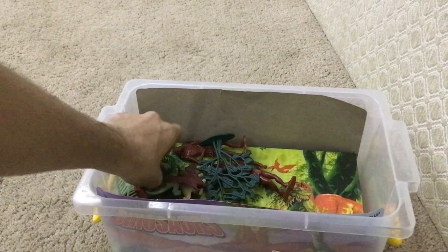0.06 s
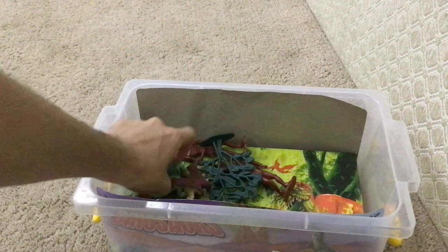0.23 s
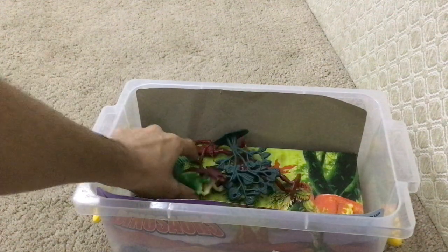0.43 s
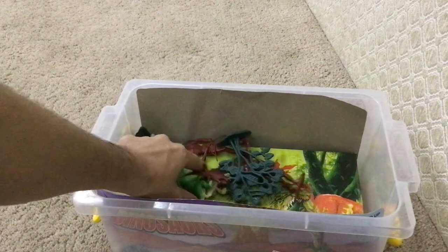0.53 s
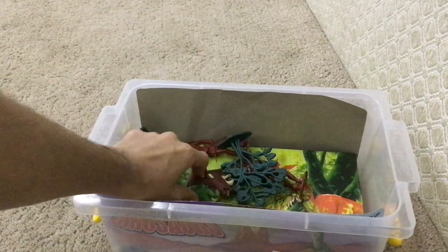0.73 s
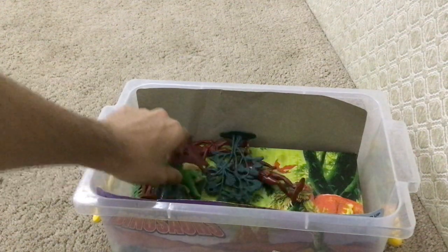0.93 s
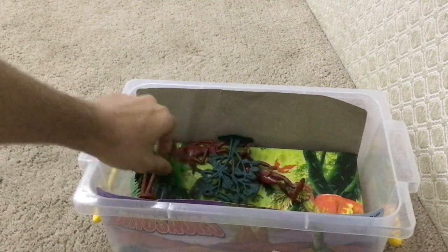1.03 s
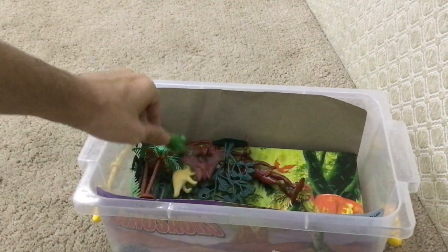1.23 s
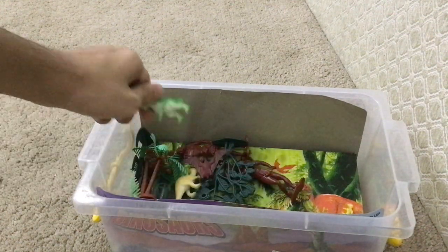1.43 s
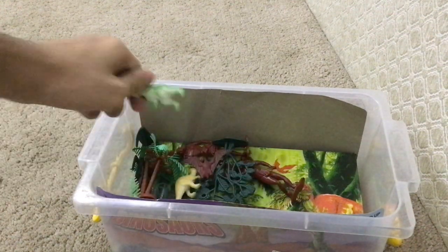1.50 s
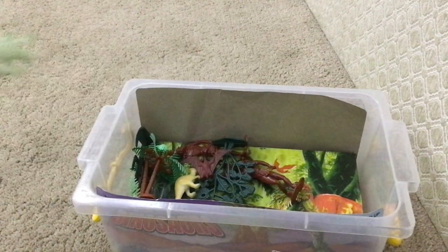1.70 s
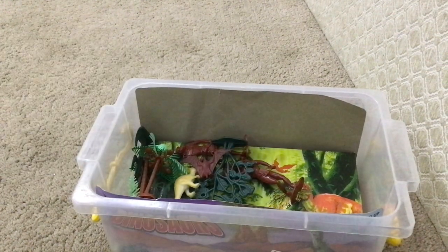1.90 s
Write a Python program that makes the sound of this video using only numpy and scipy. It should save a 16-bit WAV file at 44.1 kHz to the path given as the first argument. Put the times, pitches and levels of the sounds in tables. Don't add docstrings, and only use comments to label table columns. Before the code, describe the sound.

Plastic toys clatter and knock inside a hollow plastic bin as a hand rummages through them

```python
import sys
import numpy as np
from scipy import signal
from scipy.fft import rfft, irfft
from scipy.io import wavfile
from scipy.ndimage import uniform_filter1d

SR = 44100
rng = np.random.default_rng(int(sys.argv[2]) if len(sys.argv) > 2 else 0)


def volts_from_decibels(level):
    exponent = np.asarray(level, float) / 20
    return 10 ** exponent


def pcm_store(signal):
    levels = np.round(np.clip(np.atleast_2d(signal), -1, 1) * 32767)
    wavfile.write(sys.argv[1], SR, levels.astype(np.int16).T)


N = 85995


def evened(x):
    return x / np.sqrt(np.mean(x ** 2) + 1e-20)


def read(points, hz):
    f, value = np.transpose(points)
    return np.interp(np.log(hz + 1), np.log(f + 1), value)


def coloured(x, points):
    gain = volts_from_decibels(read(points, np.fft.rfftfreq(len(x), 1 / SR)))
    return irfft(rfft(x) * evened(gain), len(x))


def add(mix, start_s, sound):
    part = mix[round(start_s * SR):][:len(sound)]
    part += sound[:len(part)]


def tone(hz, t):
    return np.sin(2 * np.pi * hz * t)


BLOW_S = .0038

# frequency in Hz, level in dB, t60 in seconds.
BIN_MODES = [(153, -12.5, 0.27), (185.6, -12.5, 0.171), (275, -8.5, 0.094), (345, -2, 0.084),
             (417.7, -14, 0.21), (480, -11.5, 0.037), (534, -6, 0.09), (570, -26.5, 0.14), (632, -8, 0.12),
             (670, -16, .06), (774.7, -16.5, 0.14), (953, -10, 0.063), (1089, -1.5, 0.032),
             (1420, -41, 0.13)]


def knock(db, centre_hz, blow_db):
    spread_db, focus_db_per_octave = 2.5, -6.5
    detune, phase_scatter_cycles, rise_s = .012, .3, .003
    t = np.arange(SR // 4) / SR
    hz, mode_db, t60 = np.transpose(BIN_MODES)[:, :, None]
    level, phase, shift = rng.standard_normal((3, len(BIN_MODES), 1))
    octaves_off = abs(np.log2(hz / centre_hz))
    weight = volts_from_decibels(mode_db + spread_db * level + focus_db_per_octave * octaves_off)
    cycles = hz * (1 + detune * shift) * (t - BLOW_S) + phase_scatter_cycles * phase
    ring = (weight * volts_from_decibels(-60 * t / t60) * np.cos(2 * np.pi * cycles)).sum(0)
    ring *= (1 - np.exp(-(t / rise_s) ** 2)) / np.sqrt((weight ** 2).sum())
    u = t / BLOW_S
    pulse = (u * np.exp(1 - u)) ** 8
    blow = pulse * np.cos(2 * np.pi * centre_hz * 0.92 * (t - BLOW_S))
    return volts_from_decibels(db - 5.5) * (ring + volts_from_decibels(blow_db - 2.5) * blow)


# start in seconds, peak level in dB, centre frequency in Hz, sharpness of the blow in dB.
KNOCKS = [(.009, -26.5, 530, 3), (.039, -38, 570, 9), (.179, -31, 640, -12), (.201, -20, 640, 0.5),
          (.279, -30, 625, -13), (.289, -20, 550, 1.5), (.303, -18, 624, -10), (.331, -22.5, 630, -1),
          (.356, -24, 620, -12), (.368, -8, 530, -1), (0.3787, -14.5, 508, 6.5), (.3885, -15.5, 560, 6),
          (.401, -16.5, 620, -1), (.445, -26.5, 510, 2), (.472, -24, 610, -3), (.508, -22, 640, -15),
          (.539, -23.5, 640, 1), (.568, -20.5, 660, 3.5), (.652, -34.5, 346, 6.5), (.694, -35, 553, 2.5),
          (.763, -30, 535, 0), (.782, -24.5, 490, 9), (.863, -36.5, 290, -5), (.941, -32, 246, 6.5),
          (.966, -28.5, 345, 3.5),
          (1.051, -33, 345, 0), (1.087, -34.5, 620, -7), (1.185, -11, 480, 3), (1.213, -12, 480, 3),
         (1.222, -23, 600, -3), (1.245, -22, 450, 0), (1.264, -30, 545, 2), (1.314, -21, 420, -1),
         (1.327, -24, 420, -4), (1.398, -22.5, 540, 5.5), (1.409, -32, 550, -4),
          (0.68, -33, 550, 2), (.744, -39, 340, 1), (0.91, -32.5, 560, -2), (0.99, -36.5, 300, 0),
          (1.1, -37, 370, 0), (0.91, -41, 390, -4), (1.145, -41, 390, 0), (2.1, -51.5, 580, -2),
          (.486, -33, 290, -2), (0.47, -29, 310, 0), (.413, -24, 460, -1.5), (0.087, -42, 350, -0.5),
          (.252, -43.5, 320, 0)]


def knocks():
    out = np.zeros(N)
    for start_s, db, hz, blow_db in KNOCKS:
        add(out, start_s, knock(db, hz, blow_db))
    return out


# start in seconds, peak level in dB.
AIR_BLOWS = [(.179, -35.5), (.201, -28), (.289, -27), (.303, -21.5), (.331, -29), (.356, -30.5),
             (.368, -19), (.3885, -23), (.401, -25), (.441, -35), (.472, -34), (.5, -34), (.512, -30.5),
             (.54, -33), (.568, -29), (.763, -38), (1.185, -15), (1.213, -17), (1.398, -34), (1.25, -32),
             (1.264, -32)]


def air():
    air_hz, t60_s, rise_s, detune = 634, .11, .003, 0.0065
    out, t = np.zeros(N), np.arange(SR // 4) / SR
    for start_s, db in AIR_BLOWS:
        hz = air_hz * (1 + detune * rng.standard_normal())
        envelope = volts_from_decibels(db - 60 * t / t60_s) * (1 - np.exp(-t / rise_s))
        add(out, start_s, envelope * np.cos(2 * np.pi * hz * (t - BLOW_S)))
    return out


# start in seconds, peak level in dB, ring in
# Hz, relative treble snap in dB.
TICKS = [(0.0074, -47, 2270, -25), (0.146, -50, 2950, -2), (0.1534, -63.5, 2150, -15),
         (0.1792, -47.5, 2640, -32), (0.1993, -38.5, 2400, -41), (0.2877, -38.5, 2360, -29),
         (0.3023, -35.5, 2420, -43), (0.3306, -39, 2270, -19), (0.3539, -30, 2510, -10.5),
         (0.368, -26, 2680, -20), (0.3761, -33, 2513, -28), (0.404, -33.5, 2270, -33),
         (0.4213, -40, 3070, -23), (0.5156, -45.5, 2600, -28), (0.5357, -34.5, 2460, -16),
         (0.5428, -33.5, 3110, -22), (0.5682, -30.5, 2990, -33), (0.635, -47.5, 3200, -8),
         (0.6456, -50, 3300, -15), (0.3887, -41, 2820, -25), (0.436, -45, 2910, -25),
         (.453, -49, 2680, -30), (.4751, -47, 2430, -25), (.488, -46, 3010, -25), (.506, -51, 4400, -25),
         (0.6946, -50.5, 2370, -10), (0.7484, -58, 2310, -2), (0.7635, -45, 2280, -25),
         (0.7747, -44.5, 3420, -31), (0.7825, -40, 2420, -23), (0.8186, -49.5, 2560, -23),
         (0.901, -47, 2960, -13), (0.9303, -41.5, 3880, -25), (.956, -49, 2613, -20),
              (0.966, -44.5, 2530, -30), (1.1165, -51, 2400, -23), (1.281, -51, 2290, -30),
              (0.9937, -49, 2520, -39), (1.051, -51.5, 2190, -28), (1.069, -49, 2900, -20),
              (1.1406, -51, 2230, -23), (1.151, -48.5, 2350, -28.5), (1.1854, -29.5, 2170, -26),
              (1.1938, -39.5, 2170, -32), (1.2118, -29.5, 2244, -35), (1.225, -37.5, 2520, -30),
              (1.2486, -39.5, 2060, -26), (1.3125, -34.5, 2280, -15.5), (1.3244, -34.5, 3086, -23),
              (1.3966, -40.5, 2540, -39), (1.409, -46, 2850, -36)]
# frequency in Hz, level in dB.
CRACK_SPECTRUM = [(700, 4), (1300, 9.5), (2000, -12.5), (3000, -5.5), (5000, -17.5), (9000, -30),
                  (16000, -60)]


def ticks():
    crack_t60_s, snap_t60_s, ring_t60_s = 0.052, 0.019, .03
    crack, snap, ring = np.zeros((3, N))
    t = np.arange(2600) / SR
    rise = np.minimum(t / 0.00048, 1)
    for start_s, db, hz, snap_db in TICKS:
        crack_noise, snap_noise, fuzz = rng.standard_normal((3, len(t)))
        add(crack, start_s, volts_from_decibels(db - 60 * t / crack_t60_s) * crack_noise * rise)
        add(snap, start_s, volts_from_decibels(db + snap_db - 60 * t / snap_t60_s) * snap_noise * rise)
        pair = tone(hz, t) + volts_from_decibels(-13) * tone(hz * 0.36, t)
        fuzz = evened(uniform_filter1d(fuzz, size=50))
        add(ring, start_s, volts_from_decibels(db - 6 - 60 * t / ring_t60_s) * pair * rise * fuzz)
    treble = signal.butter(1, [5500, 15000], "band", fs=SR, output="sos")
    return volts_from_decibels(-2.5) * (coloured(crack, CRACK_SPECTRUM) + ring) + volts_from_decibels(-1.5) * signal.sosfilt(treble, snap)


# start in
# seconds, peak level in dB, frequency in Hz, t60 in seconds.
CLACKS = [(.9303, -36, 2530, 0.013), (.9303, -46, 3900, .012), (.202, -36, 1150, .05),
          (.9303, -37, 1420, 0.024), (.5355, -39, 4390, 0.016), (.5445, -40, 3300, .02),
          (.568, -41, 3030, 0.028), (.6355, -55, 4380, .015), (1.409, -50, 3040, .03),
          (.526, -54, 4950, 0.018), (.507, -56, 2400, .03), (.619, -54, 2950, .025),
          (.369, -18.5, 1110, 0.04), (0.508, -35.5, 1086, 0.05), (.537, -31, 1130, 0.05),
          (.331, -38, 950, .04), (.445, -40, 1130, 0.036), (.654, -45, 910, 0.038), (1.188, -22, 235, 0.08),
          (1.216, -27, 272, .08), (1.187, -30, 965, 0.047), (1.187, -29.5, 1110, .05),
          (1.187, -35, 1400, .035), (1.213, -32, 973, 0.044), (1.224, -39, 1500, 0.035),
          (1.325, -39.5, 785, 0.12), (1.402, -37.5, 155.6, 0.18), (1.8, -50, 160, 0.31),
          (.783, -45.5, 2430, 0.031)]


def clacks():
    out, t = np.zeros(N), np.arange(SR // 2) / SR
    for start_s, db, hz, t60 in CLACKS:
        add(out, start_s, volts_from_decibels(db - 60 * t / t60) * tone(hz, t) * np.minimum(t / 0.0012, 1))
    return out


# start in seconds, level in dB.
LANDINGS = [
    (1.224, -60),
    (1.315, -49),
    (1.409, -55.5),
]
# frequency in Hz, level in dB, t60 in seconds.
STIFF_TOY_MODES = [
    (1665, -8, 0.55),
    (1810, -11, 0.15),
    (3050, -15, 0.22),
]


def landings():
    out, t = np.zeros(N), np.arange(SR // 2) / SR
    for start_s, db in LANDINGS:
        for hz, mode_db, t60 in STIFF_TOY_MODES:
            rocking = evened(uniform_filter1d(rng.standard_normal(len(t)), size=500))
            add(out, start_s, rocking * volts_from_decibels(db + mode_db - 60 * t / t60) * tone(hz, t))
    return out


def grains(per_s, spread_db):
    size = volts_from_decibels(spread_db * np.minimum(rng.exponential(1, N), 3))
    return size * (rng.random(N) < per_s / SR)


# time in seconds, bump level in dB, rub level in dB.
STIR = [(0, -46, -47.5), (.07, -54.5, -63.5), (.275, -56.5, -67), (.34, -44, -52), (0.374, -35, -49),
        (.435, -44, -51), (.45, -42, -57), (.53, -39, -55), (.6, -48.5, -59), (.7, -55.5, -59),
        (.87, -49, -61), (.98, -50.5, -66), (1.168, -54, -59), (1.238, -31.5, -66), (1.3, -50, -63),
        (1.392, -43.5, -91), (1.49, -58.5, -99), (1.66, -68.5, -99)]
# frequency in Hz, level in dB.
RUSTLE_SPECTRUM = [(700, 11.5), (1300, 10), (2000, -5), (3000, -2.5), (5500, -13), (8000, -22.5),
                   (16000, -27.5)]


def stirring():
    s, stir_db, rub_db = np.transpose(STIR)
    times = np.r_[s, s[-1] + .1]
    now = np.arange(N) / SR
    stir_db, rub_db = (np.interp(now, times, np.r_[db, db[-1] - 20]) for db in (stir_db, rub_db))
    bumps = np.zeros(N)
    for hz in (165, 280, 380, 430, 640, 780):
        contacts = grains(per_s=100, spread_db=1.5)
        bumps += signal.oaconvolve(contacts, knock(0, hz, 0))[:N]
    t = np.arange(1500) / SR
    shape = signal.oaconvolve(grains(per_s=2500, spread_db=2.5), volts_from_decibels(-60 * t / 0.0083))[:N]
    shape /= uniform_filter1d(shape, size=3000)
    rustle = coloured(shape * rng.standard_normal(N), RUSTLE_SPECTRUM)
    return volts_from_decibels(stir_db - 1.5) * evened(bumps) + volts_from_decibels(rub_db - 2) * evened(rustle)


# start in seconds, level in dB, t60 in seconds.
SCRAPES = [
    (0, -58, 0.21),
    (0.637, -55, 0.076),
]


def scrapes():
    out, t = np.zeros(N), np.arange(SR // 4) / SR
    for start_s, db, t60 in SCRAPES:
        grit = rng.standard_normal(len(t)) * rng.exponential(1, len(t))
        add(out, start_s, volts_from_decibels(db - 60 * t / t60) * grit)
    return signal.sosfilt(signal.butter(2, [3800, 6800], "band", fs=SR, output="sos"), out)


# frequency in Hz, t60 in seconds.
ROOM_DECAY = [(150, 0.23), (600, 0.28), (2000, 0.35), (8000, 0.31)]


def room(x):
    hz, t, z = signal.stft(rng.standard_normal(SR // 2), SR, nperseg=256)
    decay = volts_from_decibels(-60 * t / read(ROOM_DECAY, hz)[:, None])
    tail = signal.istft(z * decay, SR, nperseg=256)[1]
    tail = np.r_[np.zeros(300), tail]
    return signal.fftconvolve(x, tail / np.linalg.norm(tail))[:N]


# frequency in Hz, level in dB per Hz.
HUM_SPECTRUM = [(72, -2), (108, -5.5), (285, -21), (430, -27), (560, -24.5), (1000, -37), (2200, -46),
                (4500, -47), (16000, -58.5)]


def hum():
    return volts_from_decibels(-51.5) * evened(coloured(rng.standard_normal(N), HUM_SPECTRUM))


def scene():
    toys = knocks() + air() + ticks() + clacks() + landings() + stirring() + scrapes()
    return (toys + volts_from_decibels(-12) * room(toys) + hum())[None]


def roll_off(x):
    return signal.sosfilt(signal.butter(12, 16440, fs=SR, output="sos"), x)


def record(dry):
    limit, low_hz, high_hz = .36, 56.6, 17400
    x = limit * np.tanh(dry / limit)
    x = signal.sosfilt(signal.butter(6, low_hz, "high", fs=SR, output="sos"), x)
    x = signal.sosfilt(signal.cheby2(10, 50, high_hz, fs=SR, output="sos"), x)
    return roll_off(x)


dry = scene()
out = record(dry)
pcm_store(out)
```